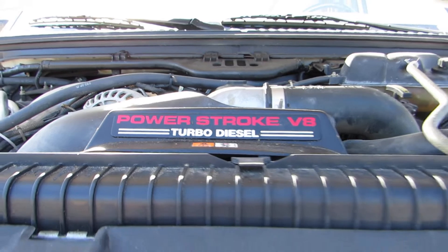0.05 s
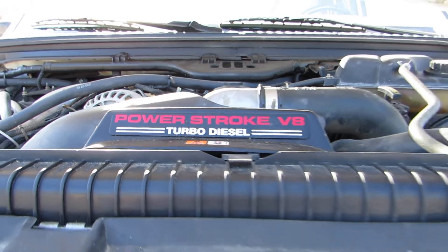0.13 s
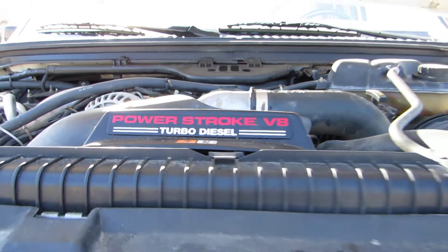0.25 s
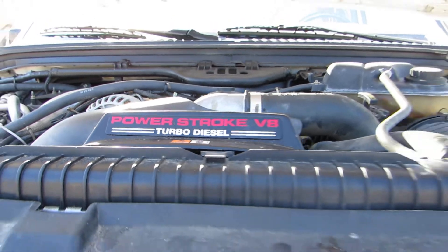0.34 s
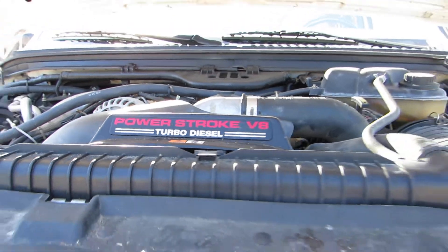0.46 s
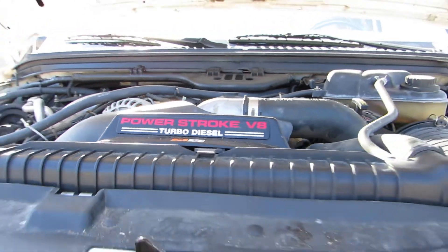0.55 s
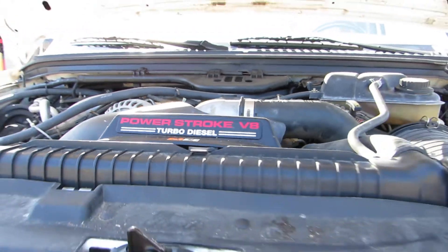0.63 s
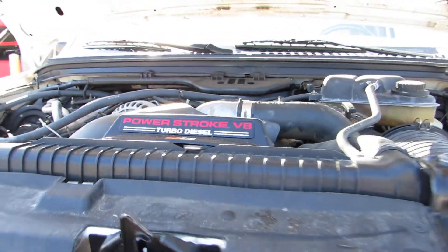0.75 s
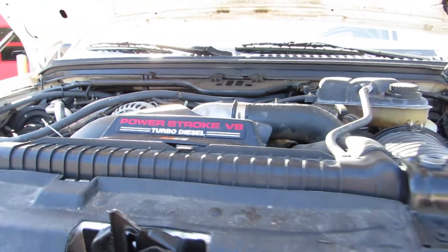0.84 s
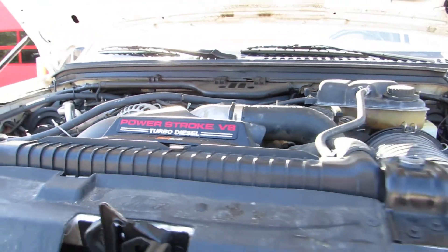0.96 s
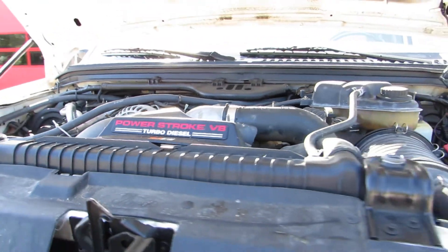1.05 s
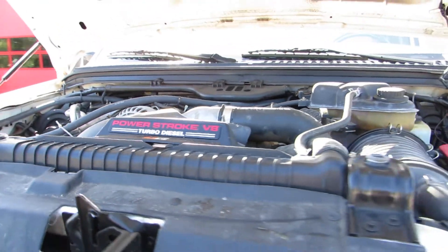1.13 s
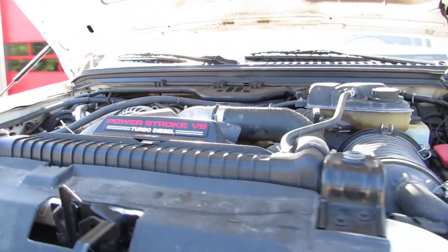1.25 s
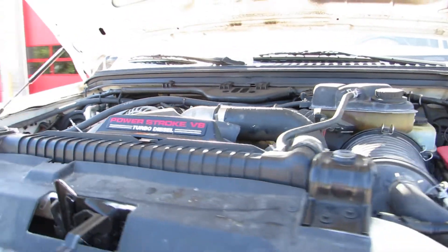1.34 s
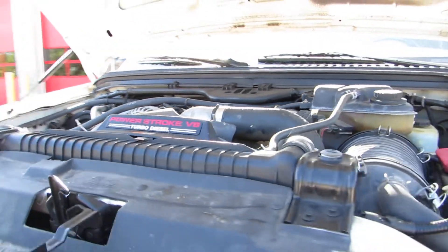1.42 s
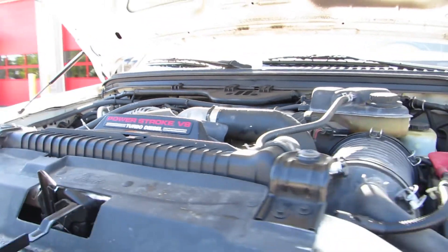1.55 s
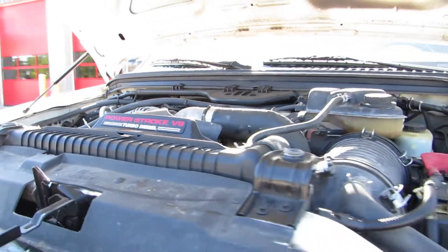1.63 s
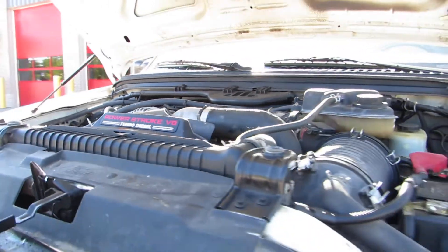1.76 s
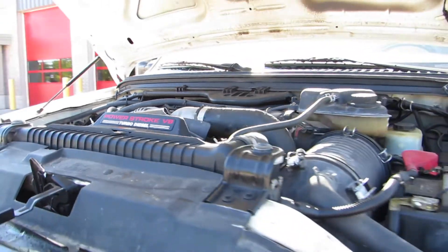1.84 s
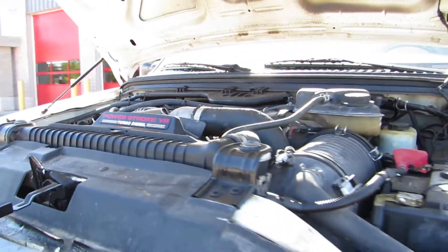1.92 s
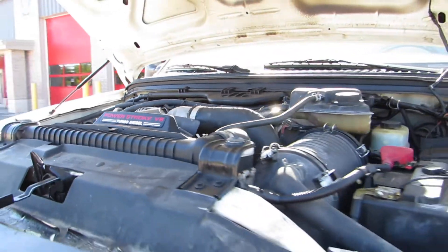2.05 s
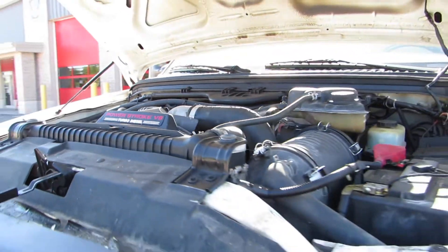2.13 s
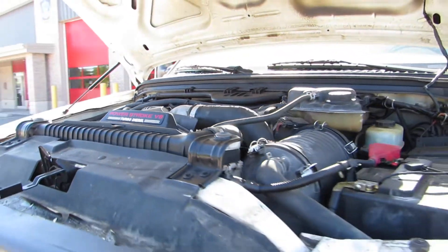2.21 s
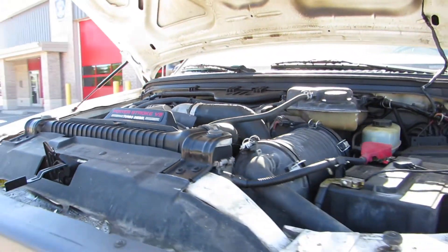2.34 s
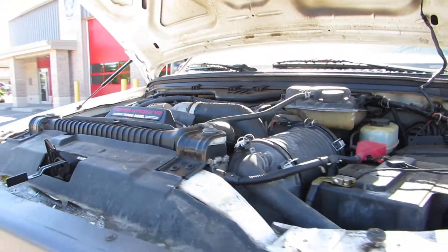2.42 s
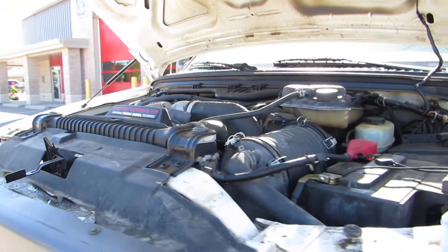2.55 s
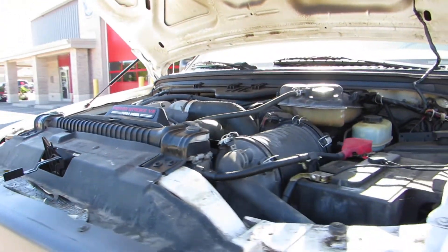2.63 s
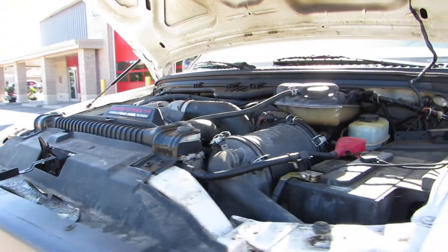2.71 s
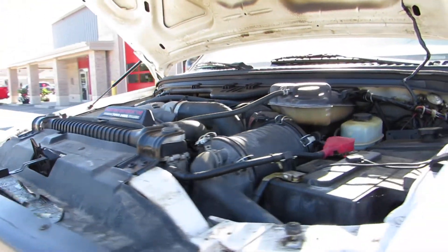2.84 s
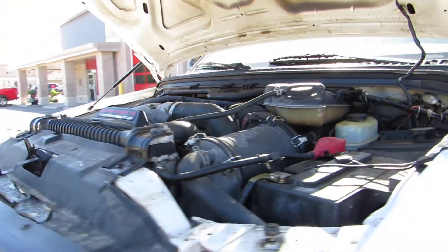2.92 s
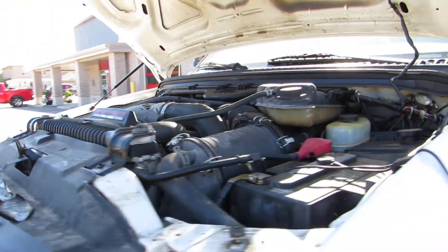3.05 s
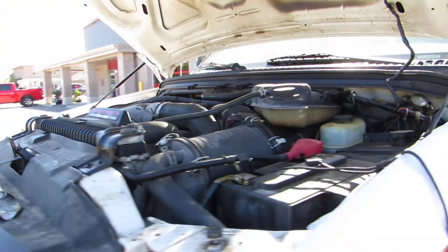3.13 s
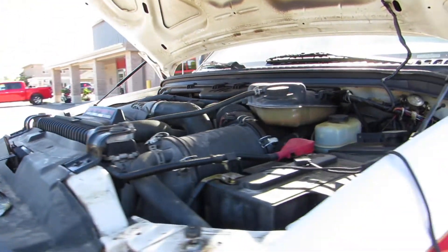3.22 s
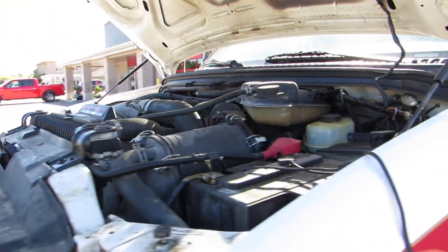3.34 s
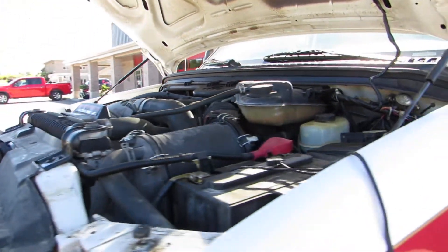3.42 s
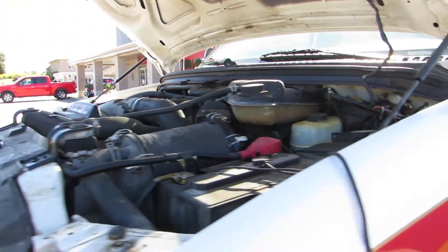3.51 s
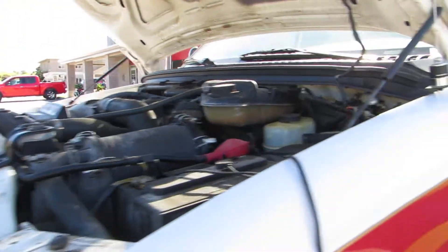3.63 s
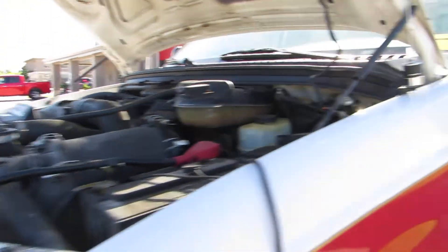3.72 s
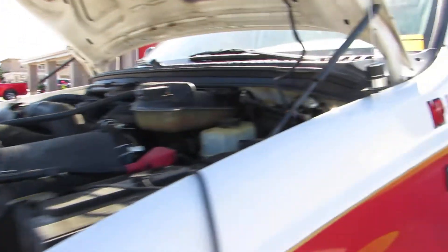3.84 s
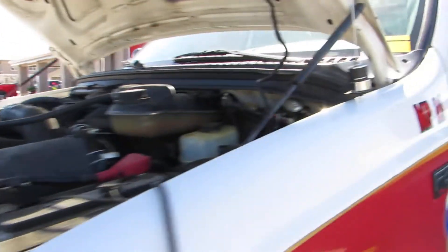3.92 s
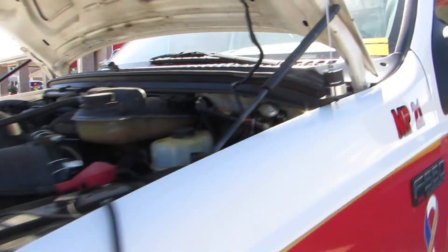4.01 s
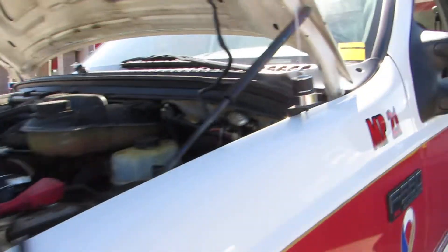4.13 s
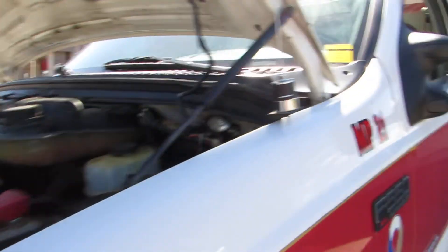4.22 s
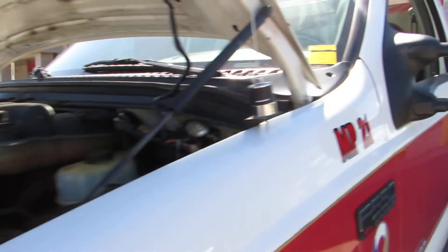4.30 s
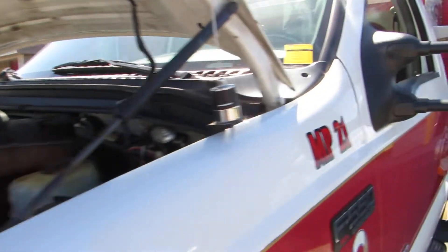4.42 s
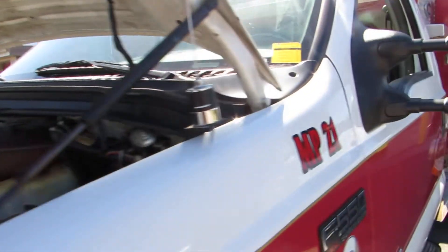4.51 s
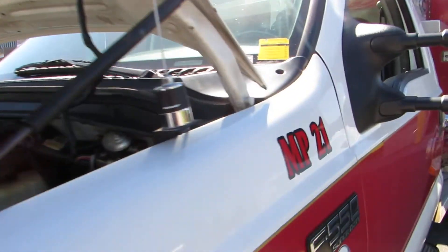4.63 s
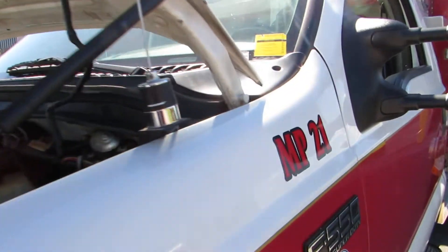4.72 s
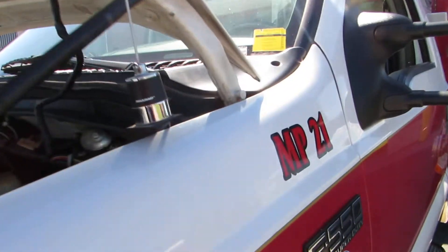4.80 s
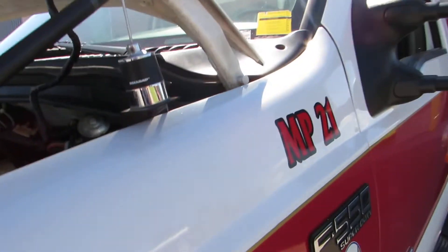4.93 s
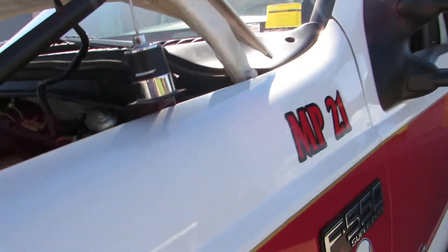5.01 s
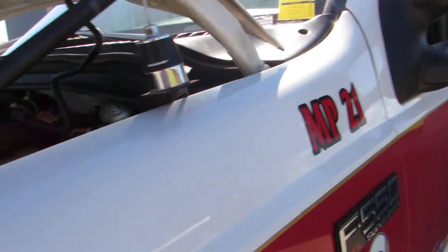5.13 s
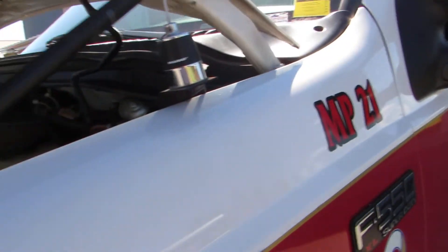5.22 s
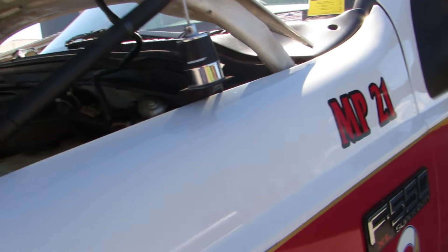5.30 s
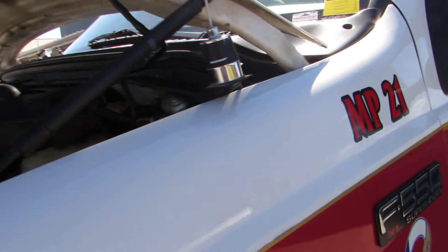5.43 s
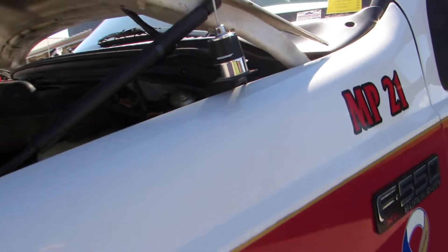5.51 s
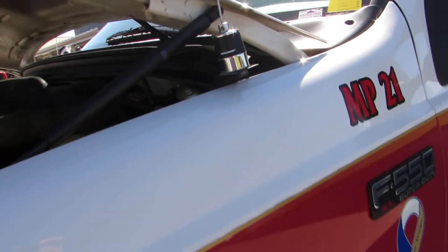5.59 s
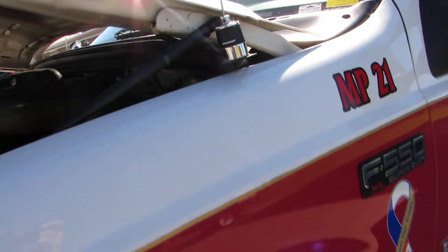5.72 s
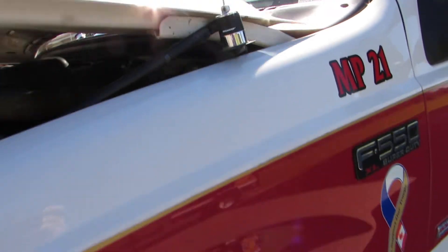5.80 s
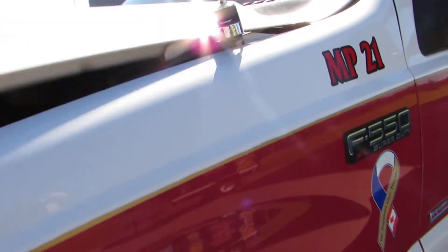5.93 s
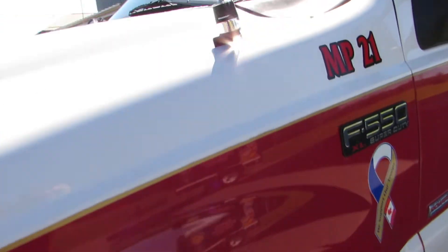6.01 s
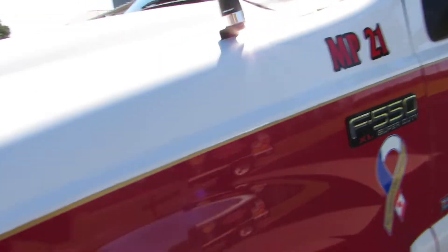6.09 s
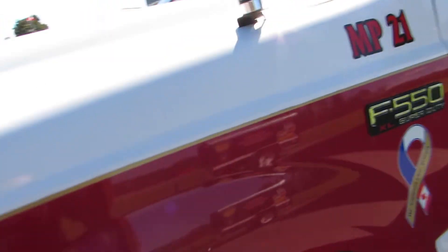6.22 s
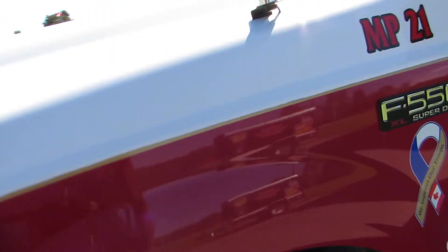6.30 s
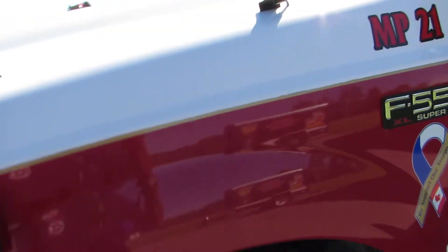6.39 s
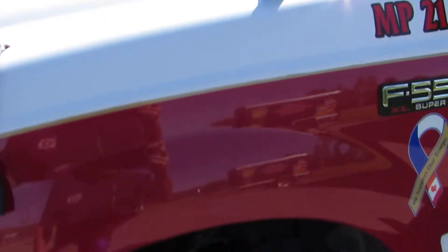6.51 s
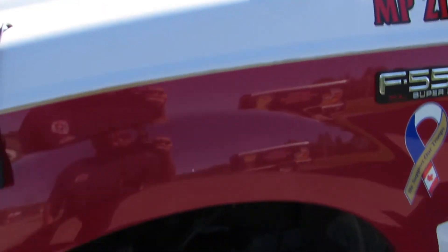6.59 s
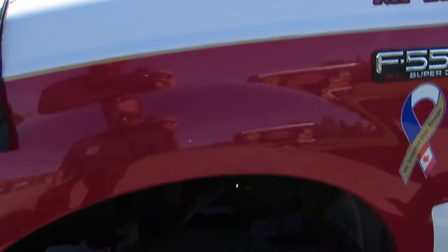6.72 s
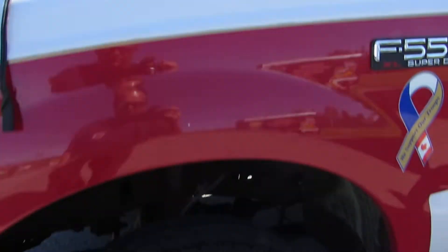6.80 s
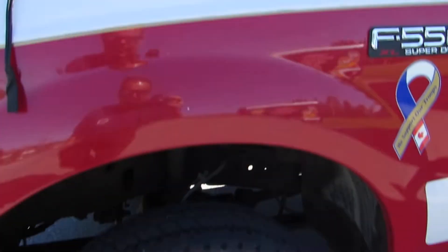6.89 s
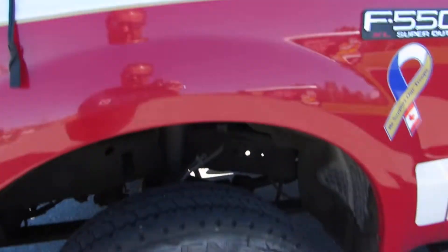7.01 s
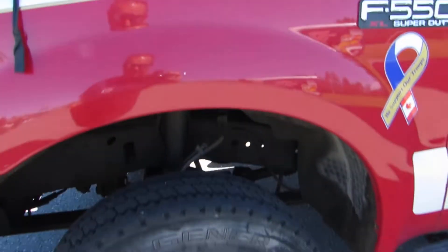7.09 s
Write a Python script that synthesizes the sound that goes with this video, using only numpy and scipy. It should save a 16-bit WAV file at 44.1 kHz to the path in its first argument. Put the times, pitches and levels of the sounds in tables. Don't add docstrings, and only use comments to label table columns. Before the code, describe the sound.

From 0 s a large eight-cylinder diesel idles close by outdoors: about forty-four uneven knocks a second, hard midrange clatter, bright ticking, low exhaust and fan throb, thin belt whine. It is loudest around 0.5 s, then falls as the handheld microphone moves along the bay. Wind begins lightly before 1 s and from 1.1 to 4 s buffets the stereo microphone in wide, out-of-phase rumbles, flutters and pops, thickest from 2 to 3.5 s. By 3.5 s the engine is much quieter; around 4.4 to 5 s it returns a little, leaning left, with more gusts from 4.8 to 5.4 s. At 5.96 s the hood drops: a quick cluster of metallic impacts, bright then booming, with small bounces and a panel ring dying within half a second. The idle carries on faint and muffled, gusts returning from 6.3 s, a short finger scuff near 6.9 s, ending mid-idle at about 7.1 s.

```python
import sys
import numpy as np
from scipy import signal
from scipy.fft import rfft, irfft, next_fast_len
from scipy.io import wavfile
from scipy.ndimage import uniform_filter1d, map_coordinates

SR = 44100
rng = np.random.default_rng(int(sys.argv[2]) if len(sys.argv) > 2 else 0)


def wav_record(signal):
    frames = np.transpose(np.atleast_2d(signal))
    bounded = np.clip(frames, -1, 1)
    quanta = np.round(bounded * 32767).astype(np.int16)
    wavfile.write(sys.argv[1], SR, quanta)


def gain_from_db(level_db):
    decades = np.asarray(level_db, float) / 20
    return 10 ** decades


N = 315315
TIME = np.arange(N) / SR
FIRING_HZ = 43.7
PORT_LAG_S_PER_DB = 9e-6


def unit(x):
    return x / np.sqrt(np.mean(x ** 2) + 1e-20)


def along(points, hz):
    f, v = np.transpose(points)
    return np.interp(np.log(hz + 1), np.log(f + 1), v)


def curves(rows):
    s, *cols = np.transpose(rows)
    return [np.interp(TIME, s, c) for c in cols]


def wobble(rate, channels):
    at = np.arange(0, N + 32, 32)
    knots = rng.standard_normal((channels, int(N * rate / SR) + 4))
    smooth = [map_coordinates(k, [at * rate / SR]) for k in knots]
    return np.array([np.interp(np.arange(N), at, k) for k in smooth])


def filtered(x, response):
    m = next_fast_len(N + SR // 4)
    return irfft(rfft(x, m) * response(np.fft.rfftfreq(m, 1 / SR)), m)[..., :N]


def modes(table, f):
    return sum((-1) ** k * gain_from_db(db) * 1j * f * w / (c * c - f * f + 1j * f * w)
               for k, (c, w, db) in enumerate(table))


def left_right(mid, side):
    return np.array([mid + side, mid - side])


# time in seconds, block ring level in dB,
# shading of the block from the ports in dB, left-right balance in dB.
WALK = [(0.0, -21, 0.5, 0.4), (0.55, -19, -2, 0), (1.0, -23, 2, -0.3), (1.25, -24, 3, -0.5),
        (1.5, -28.5, 2, -1), (1.75, -24.5, 1, -1.2), (2.0, -25.5, 0, -1), (2.3, -34, 1.5, -0.7),
        (2.8, -35, -2, -1), (3.25, -37, 1, -0.8), (3.5, -40, 1, 0), (3.8, -34, -1, 0.5),
        (4.4, -29.5, -2, 4.5), (5.0, -32, 1, 4.5), (5.94, -35.5, -1, 2), (6.15, -45, 1, 0.6),
        (6.6, -43, 2.5, .8), (7.15, -45, 1.5, 0.5)]
# time in seconds, how far shut from 0 to 1.
SHUTTING = [(0, 0), (5.96, 0), (6.05, 1), (7.15, 1)]
# frequency in Hz, change in dB.
UNDER_HOOD = [(400, 2), (620, -2), (780, 3.5), (1000, -1.5), (1400, 0), (1950, -3), (2800, 2.5),
              (3500, 0.5), (9000, -3), (13000, -5)]


def engine():
    ring_db, shade_db, pan_db = curves(WALK)
    shut = curves(SHUTTING)[0]
    crank, late, levels = firings()
    rapping = block(crank, late, levels, shade_db, shut) + valve_gear(crank, late, levels, shade_db)
    bay = patchy(rapping, depth_db=1.6) + belt()
    bay = (1 - shut) * bay + shut * filtered(bay, lambda f: gain_from_db(along(UNDER_HOOD, f)))
    heard = np.arange(N) - np.outer([.5, -.5], SR * PORT_LAG_S_PER_DB * -pan_db)
    bay = np.array([map_coordinates(port, [at]) for port, at in zip(bay, heard)])
    return bay * gain_from_db(ring_db + np.outer([.5, -.5], pan_db)) + throb(crank)


# time in seconds, lead in firings.
LEAD = [(0.0, 0.35), (1.4, 0.33), (2.0, 0.27), (2.6, 0.3), (3.6, 0.31), (4.2, 0.38), (5.4, 0.41),
        (6.4, 0.26), (7.15, 0.23)]
# drone, ring, cover, clatter, tick and fizz levels in dB,
# lateness in firings.
CYLINDERS = [(2.5, 4.5, 7, 5, 6.5, 11, 0.064), (3.5, 1, -2, 5.5, 5.5, 14, 0.1),
             (-3, -7, 5, 2, 1, 11.5, 0.067), (-6.5, 5.5, 12.5, 6.5, 6, 18, 0.047),
             (0.5, 1, 7, 3, 4, 7.5, 0.15), (0, 2, 10.5, 5, 3, 14.5, 0.05),
             (1.5, -1.8, -18, 6, 4.5, 11, 0.073), (2, -1, -10, 1, 2, 14.5, 0.09)]


def firings():
    crank = FIRING_HZ * TIME + curves(LEAD)[0] + .38
    rows = np.array(CYLINDERS)[np.arange(int(crank[-1]) + 1) % 8]
    burn = rng.standard_normal((len(rows), 2))
    levels = rows[:, :-1].T + 1.1 * burn[:, 0]
    late = rows[:, -1] + 0.015 * burn[:, 1]
    return crank, late, levels


# frequency in Hz, width in Hz, level in dB.
RING = [(1014, 116, -9.5), (1315, 120, -2), (1479, 137, -1.5), (1646, 240, -4)]
# frequency in Hz, width in Hz, level in dB.
COVER = [(1405.5, 58, 0)]
# frequency in Hz, density in dB per Hz.
DRONE = [(35, -18), (60, -2.5), (139, -7), (182, -1.5), (334, -6.5), (378, -5), (418, -7.5), (528, -3),
         (866, -1), (1150, 0), (1500, -8.5), (2530, -120)]


def block(crank, late, levels, shade_db, shut):
    def ringing(f):
        return modes(RING, f) / (1 + (f / 1780) ** 24) / (1 + (900 / (f + 1)) ** 6)

    drone_c, ring_c, cover_c = levels[:3]
    ring = raps(crank, late, ring_c, repeat=0.45, rise=0.1, fall_db=-29, floor_db=-24, scatter_db=1.0)
    cover = raps(crank, late, cover_c, repeat=0.7, rise=0.09, fall_db=-14, floor_db=-7, scatter_db=-1.8)
    drone = raps(crank, late, drone_c, repeat=0.5, rise=0.09, fall_db=-22, floor_db=-11, scatter_db=-0.16)
    ring = spread(ring, ringing)
    cover = spread(cover, lambda f: modes(COVER, f) ** 1.47)
    drone = spread(drone, lambda f: gain_from_db(along(DRONE, f)))
    drone_db = -5 + 1.2 * shade_db
    return gain_from_db(-3.0) * ring + gain_from_db(-7.0 - 2.8 * shut) * cover + gain_from_db(drone_db + 3.0) * drone


# frequency in Hz, density in dB per Hz.
CLATTER = [(1030, -30), (1750, -2.5), (1880, -5.5), (2190, -2), (2550, -5.5), (2910, -4.5), (3300, -9),
           (3850, -19), (4000, -30.5), (5200, -52), (8800, -120)]
# frequency in Hz, density in dB per Hz.
TICK = [(2290, -59), (3900, -7.5), (4130, -2.5), (4490, -7.5), (4970, 0.5), (5690, -11), (6130, -4.5),
        (6560, -8.5), (7760, -3), (8840, -11.5), (9460, -11), (10600, -18.5), (12500, -13), (13600, -23.5),
        (15000, -29)]


def valve_gear(crank, late, levels, shade_db):
    def above(f):
        return 1 / (1 + (7200 / (f + 1)) ** 8)

    clatter_c, tick_c, fizz_c = levels[3:]
    clatter = raps(crank, late, clatter_c, repeat=0.43, rise=0.082, fall_db=-22.5, floor_db=-14.5,
                   scatter_db=0.44)
    tick = raps(crank, late, tick_c, repeat=0.081, rise=0.07, fall_db=-27.5, floor_db=-14.5, scatter_db=2.3)
    fizz = raps(crank, late, fizz_c, repeat=0.033, rise=0.065, fall_db=-17.5, floor_db=-4.5, scatter_db=3.0)
    clatter = spread(clatter, lambda f: gain_from_db(along(CLATTER, f)))
    tick = spread(tick, lambda f: gain_from_db(along(TICK, f)) * (1 - above(f)))
    fizz = spread(fizz, lambda f: gain_from_db(along(TICK, f)) * above(f))
    clatter_db = -6 + shade_db
    tick_db = -10.5 + .7 * shade_db
    return gain_from_db(clatter_db + 0.3) * clatter + gain_from_db(tick_db) * (tick + gain_from_db(-6.0) * fizz)


def raps(crank, late, cylinder_db, repeat, rise, fall_db, floor_db, scatter_db):
    firing, part = np.divmod(crank, 1)
    firing = firing.astype(int)
    size = gain_from_db(cylinder_db + scatter_db * rng.standard_normal(len(late)))
    since = np.maximum(part - late[firing], 0)
    gate = size[firing] * (1 - np.exp(-since / rise)) ** 2 * gain_from_db(fall_db * since)
    gate += gain_from_db(floor_db + 10 * curves(SHUTTING)[0])
    gate += size[firing - 1] * gain_from_db(fall_db * (part + 0.5))
    cycle = round(8 * SR / FIRING_HZ)
    same = rng.standard_normal((2, cycle))[:, (crank / 8 % 1 * cycle).astype(int)]
    fresh = rng.standard_normal((2, N))
    return gate * (np.sqrt(repeat) * same + np.sqrt(1 - repeat) * fresh)


# frequency in Hz, side minus mid in dB.
WIDTH = [(60, -13), (150, -31), (370, -13), (940, -14), (2340, -12.5), (5840, -7.5), (9500, -1.5),
         (14600, -6)]


def spread(pair, colour):
    mid, side = filtered(pair, lambda hz: colour(hz) * [hz ** 0, gain_from_db(along(WIDTH, hz))])
    return left_right(mid, side) / np.std(mid)


def patchy(x, depth_db):
    z = signal.stft(x, nperseg=256)[2]
    field = rng.standard_normal(z.shape[1:])
    field = uniform_filter1d(uniform_filter1d(field, size=3, axis=0), size=7, axis=1)
    gain = gain_from_db(depth_db * unit(field) - 0.1 * depth_db ** 2)
    return signal.istft(z * gain, nperseg=256)[1][:, :N]


# frequency in Hz, level in dB against the block ring.
BELT = [(824.5, -25.5), (1637, -33)]


def belt():
    return sum(gain_from_db(db + 7.9 * w) * np.sin(2 * np.pi * hz * TIME + w)
               for (hz, db), w in zip(BELT, wobble(7.3, channels=2)))


# time in seconds, level in dB.
THROB = [(0, -28), (1, -28), (1.6, -33.5), (2.2, -37), (3, -42), (3.8, -43.5), (4.5, -40.5), (5.6, -43.5),
         (6.3, -45), (7.15, -43)]
# multiple of the firing rate, level in dB.
HARMONICS = [(1, -2.5), (2, -5), (3, -24), (4, -8), (5, -22), (6, -11.5), (7, -17), (8, -20), (9, -18),
             (10, -13), (11, -13), (12, -11), (13, -27), (14, -16), (15, -7.5), (16, -3.5)]


def throb(crank):
    total = np.zeros(N)
    for (k, db), w in zip(HARMONICS, wobble(11, channels=len(HARMONICS))):
        level = gain_from_db(db - 0.16 * k + (2.0 + 0.092 * k) * w)
        total += level * np.sin(2 * np.pi * (k * (crank + 0.0075 * w) + rng.random()))
    return gain_from_db(curves(THROB)[0]) * total


# time in seconds, burst level in dB, brightness in dB per octave,
# decay stretch as a factor, panel ring level in dB.
SLAM = [
    (5.958, -34, 3.5, 0.71, -60),
    (5.972, -13.5, 2, 0.73, -37),
    (5.989, -10.5, 1.5, 1.07, -29),
    (6.003, -12.5, -0.6, 0.83, -28),
    (6.013, -20, -2.5, 0.75, -18.5),
    (6.044, -24, -2.5, 1, -25),
    (6.075, -32.5, -3.5, 1.2, -28),
    (6.091, -34, -0.5, 2.9, -48),
]
# frequency in Hz, level in dB, time to fall 60 dB in seconds.
PANEL = [(74.6, -4, 0.56), (186.4, 2.5, 0.45), (349, -5.5, 0.61), (517, -13.5, 0.49), (600, -17, 0.41),
         (628, -8, 0.21), (770, -14, 0.37), (1043, -17, 0.23), (1110, -20, 0.4), (1380, -32, 0.91)]
# frequency in Hz, density in dB per Hz.
SHEET = [(30, -5.5), (70, -2), (200, -11), (600, -8.5), (1200, -14.5), (2500, -19.5), (6000, -33.5),
         (12500, -42), (15500, -53)]
# frequency in Hz, time to fall 60 dB in seconds.
DYING = [(100, 0.67), (500, 0.36), (1500, 0.23), (4000, 0.15), (12000, 0.17)]


def hood():
    out, t = np.zeros((2, N + SR)), np.arange(SR // 2) / SR
    ends = (1 - np.exp(-t / 0.0012)) * (1 - (t / t[-1]) ** 2)
    for s, db, bright_db, stretch, ring_db in SLAM:
        hz, at, z = signal.stft(rng.standard_normal((2, len(t))), SR, nperseg=128)
        colour_db = along(SHEET, hz) + bright_db * np.log2(hz / 1000 + 0.05)
        fade_db = -60 * at / (stretch * along(DYING, hz)[:, None])
        burst = z * gain_from_db(colour_db[:, None] + 12 + fade_db)
        mid, side = signal.istft(burst, SR, nperseg=128)[1][:, :len(t)]
        mid = gain_from_db(db + 5.5) * mid
        for f, level, t60 in PANEL:
            mid += gain_from_db(ring_db + level - 60 * t / t60) * np.sin(2 * np.pi * (f * t + rng.random()))
        mid += gain_from_db(db - 6 - 60 * t / 0.12) * np.sin(2 * np.pi * 1170 * t)
        side = gain_from_db(db - 4.0) * side
        out[:, round(s * SR):][:, :len(t)] += left_right(mid, side) * ends
    return out[:, :N]


# frequency in Hz, density in dB per Hz.
RUMBLE = [(8.8, -31), (25, -7), (49, -0.5), (107, 1), (226, -4), (500, -37.5), (650, -63), (1100, -120)]
# frequency in Hz, density in dB per Hz.
FLUTTER = [(120, -30), (220, 2), (330, 1.5), (500, -11), (800, -18.5), (1300, -39), (2500, -87)]
# time in seconds, left-right balance in dB.
FACING = [(0, 5), (1.3, 9), (1.7, 21), (1.95, -15), (2.3, -5), (2.6, 5), (3.4, 17), (3.7, 2), (4.6, -6),
          (4.95, -3.5), (5.3, 12.5), (5.6, 0), (6.5, -1), (7.15, -1.5)]


def wind():
    slow, fast, lull = gusts()
    lumps = 1.9 * wobble(30, channels=2)
    rumble = filtered(rng.standard_normal((2, N)) * gain_from_db(lumps),
                      lambda f: gain_from_db(along(RUMBLE, f)) / (1 + (30 / (f + 1)) ** 4))
    snaps = gain_from_db(lumps + 6.0 * wobble(90, channels=2))
    flutter = filtered(rng.standard_normal((2, N)) * snaps, lambda f: gain_from_db(along(FLUTTER, f)))
    deep = filtered(rumble, lambda f: 1 / (1 + (f / 110) ** 4))
    stir = gain_from_db(5.5 * wobble(9, channels=1)) * unit(deep)
    lean = gain_from_db(np.outer([.5, -.5], curves(FACING)[0]))
    lean = lean / np.sqrt(np.sum(lean ** 2, axis=0))
    buffeting = slow * unit(rumble) + fast * unit(flutter) + lull * stir
    left, right = lean * gain_from_db(-4.5) * buffeting + gain_from_db(2.2) * pops()
    return left_right(gain_from_db(-15.0) * (left + right), left - right)


# start in seconds, length in seconds, rumble level in dB,
# flutter in dB against the rumble.
GUSTS = [(0.59, .03, -31, -14), (0.68, .17, -22, -24), (1.095, 0.083, -10.5, -15), (1.206, .19, -11, -27),
         (1.414, 0.12, -12, -17.5), (1.594, 0.037, -12.5, -14), (1.698, .19, -12, -26),
         (1.933, 0.13, -12, -9), (2.09, 0.24, -11, -2.5), (2.38, .12, -15.5, -3.5), (2.495, 0.11, -9.5, -5),
         (2.655, 0.12, -9.5, -8), (2.821, 0.12, -15.5, 1.5), (2.992, 0.027, -15.5, -6),
         (3.072, 0.031, -11, 0), (3.142, .35, -11, -2), (3.56, 0.11, -23, -6), (3.7, .11, -14.5, -9.5),
         (3.862, 0.093, -16, -9.5), (4.29, 0.15, -27.5, -24), (4.62, 0.09, -26, -18),
         (4.781, 0.14, -10.5, -8), (5.003, 0.11, -14.5, -9.5), (5.145, .28, -11, -7.5),
         (5.53, .16, -28, -4), (6.293, 0.187, -19, -16), (6.503, 0.1, -15, -6), (6.632, 0.24, -11.5, -5.5),
         (6.918, 0.2, -12, -3)]


def gusts():
    rise_s, fall_s = 0.0085, 0.016
    s, length, db, flutter_db = np.transpose(GUSTS)[:, :, None]
    t = np.arange(0, N, 32) / SR
    shape = np.exp(np.minimum(0, np.minimum((t - s) / rise_s, (s + length - t) / fall_s)))
    slow = np.sum(gain_from_db(db) * shape, axis=0)
    fast = np.sum(gain_from_db(db + flutter_db) * shape, axis=0)
    lull = gain_from_db(-36 - .5 * t)
    return [np.interp(TIME, t, gain) for gain in (slow, fast, lull)]


# time in seconds, level in dB, sharpness in dB.
POPS = [(2.119, -14, -22), (2.182, -15, -20), (2.265, -20, -11), (2.329, -17, -12), (2.503, -11, -11),
        (2.545, -20, -3), (2.584, -18, -17), (2.676, -17, -18), (2.857, -18, -14), (2.897, -14, -10),
        (3.096, -14, -9), (3.154, -19, -13), (3.232, -11, -14), (3.3, -7, -18.5), (3.403, -15, -15),
        (3.473, -18, -17), (3.495, -20.5, -7), (3.795, -17, -24), (3.936, -22, -17), (4.854, -15, -15),
        (4.919, -19, -22), (5.427, -19.5, -14), (6.558, -25, -4), (6.801, -12, -8), (6.846, -10.5, -7),
        (6.941, -18, -4), (7.018, -15, -3), (7.053, -18, -9)]


def pops():
    out, t, facing = np.zeros((2, N)), np.arange(-400, 400) / SR, curves(FACING)[0]
    for (s, db, sharp_db), turn in zip(POPS, rng.random(len(POPS))):
        middle = round(s * SR)
        hz = 430 * gain_from_db(0.26 * np.clip(sharp_db + 12.0, -10, 8))
        thump = np.exp(-(t * hz / 0.72) ** 2) * np.cos(2 * np.pi * (hz * t + turn))
        port = int(facing[middle] < 0)
        out[port, middle - 400:][:800] += gain_from_db(db + 7) * thump
    return out


# start in seconds, level in dB, length in seconds.
BRUSH = [
    (5.17, -58, .03),
    (6.685, -61, .03),
    (6.877, -46, 0.023),
]


def fingers():
    strokes = sum(gain_from_db(db) * np.exp(-((TIME - s - length / 2) / (length / 2)) ** 2) for s, db, length in BRUSH)
    return strokes * filtered(rng.standard_normal(N),
                              lambda f: 1.5 / (1 + (6000 / (f + 1)) ** 4) / (1 + (f / 13500) ** 16))


def scene():
    return engine() + hood() + wind() + fingers()


# frequency in Hz, width in Hz, depth from 0 to 1.
NOTCHES = [(3990, 170, 0.62), (7820, 83, 0.84)]


def microphone(dry):
    def cavity(f):
        return np.prod([1 - depth / (1 + ((f - c) / w) ** 2) for c, w, depth in NOTCHES], axis=0)

    x = filtered(dry, cavity)
    return x / (1 + np.abs(x / .97) ** 6) ** (1 / 6)


def top_cut(x):
    return signal.sosfilt(signal.butter(12, 15180, fs=SR, output="sos"), x)


def record(dry):
    x = microphone(dry)
    return top_cut(x)


dry = scene()
out = record(dry)
wav_record(out)
```